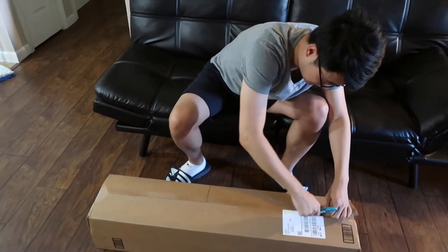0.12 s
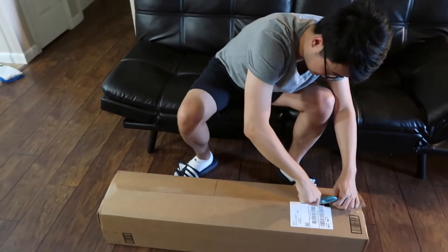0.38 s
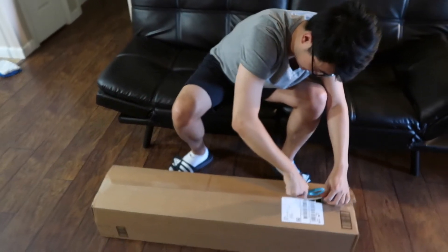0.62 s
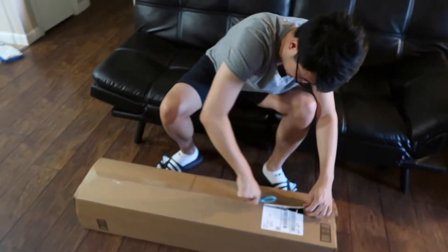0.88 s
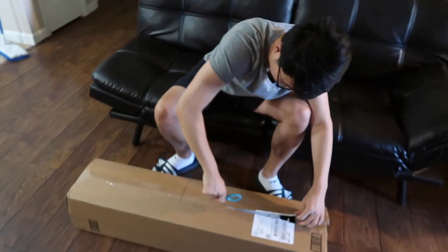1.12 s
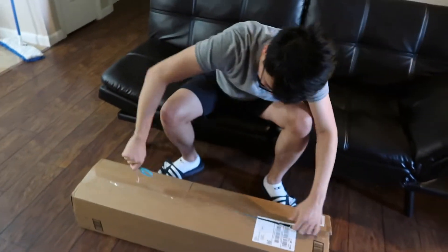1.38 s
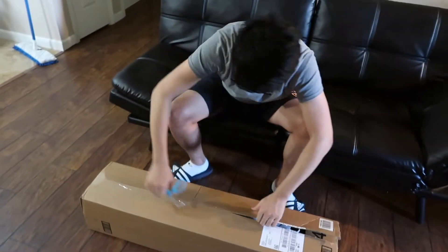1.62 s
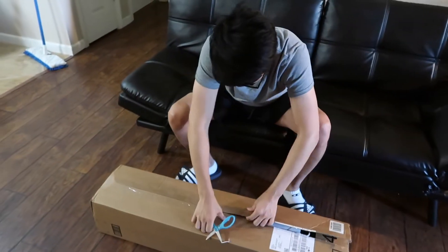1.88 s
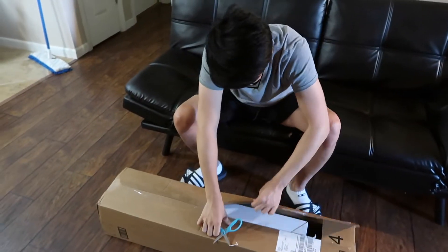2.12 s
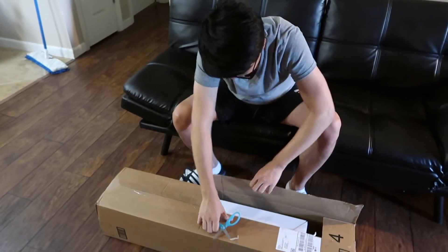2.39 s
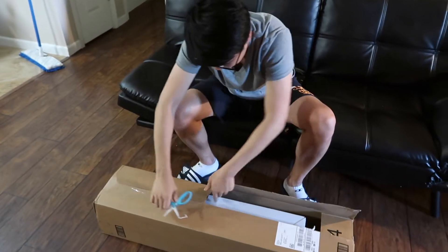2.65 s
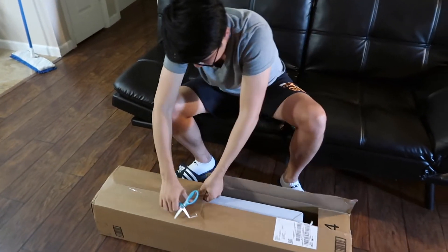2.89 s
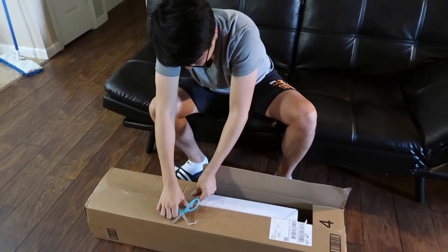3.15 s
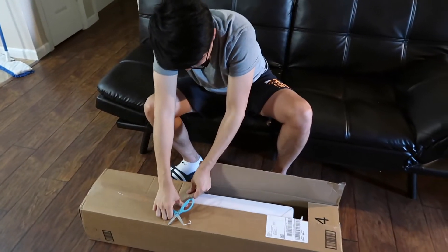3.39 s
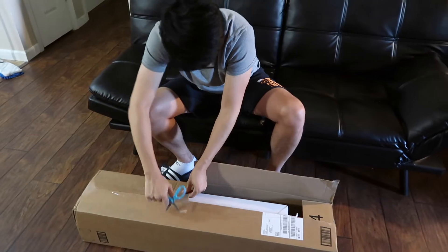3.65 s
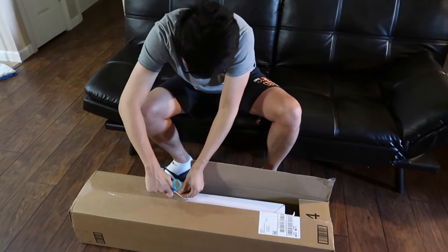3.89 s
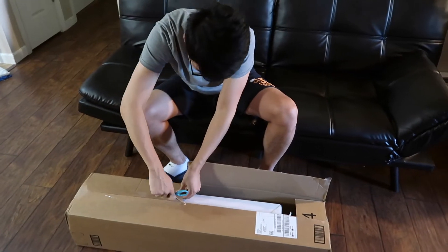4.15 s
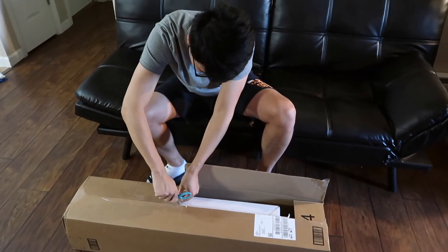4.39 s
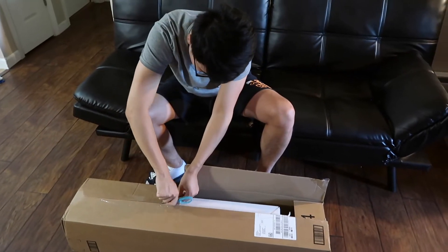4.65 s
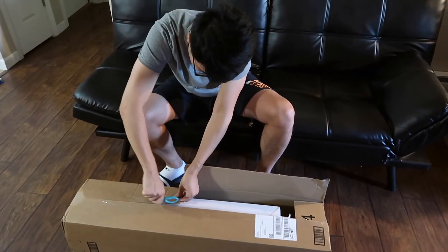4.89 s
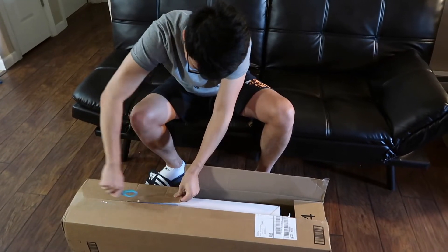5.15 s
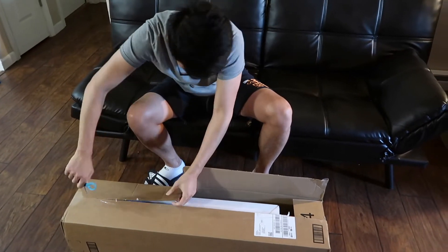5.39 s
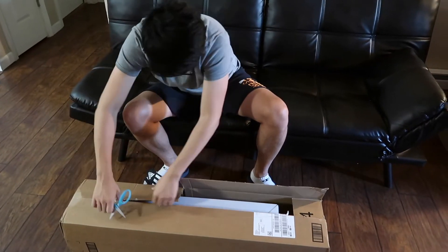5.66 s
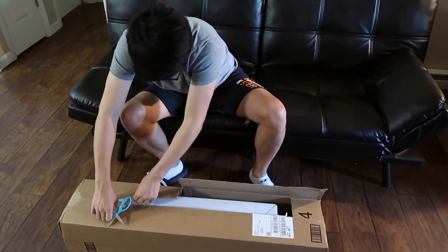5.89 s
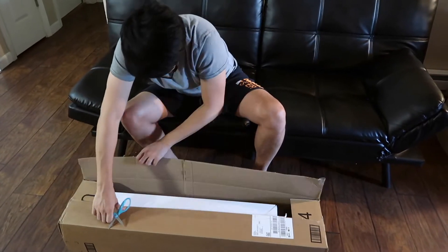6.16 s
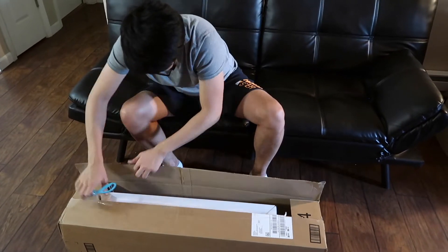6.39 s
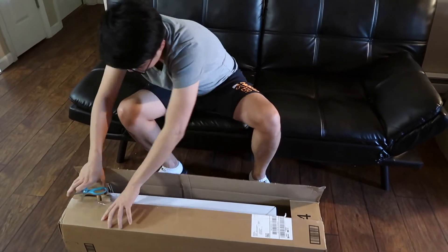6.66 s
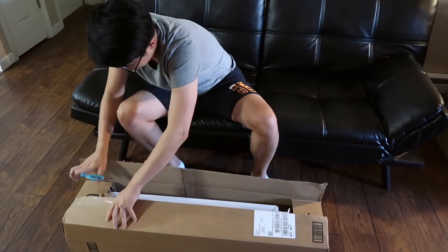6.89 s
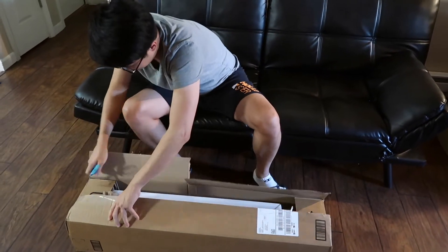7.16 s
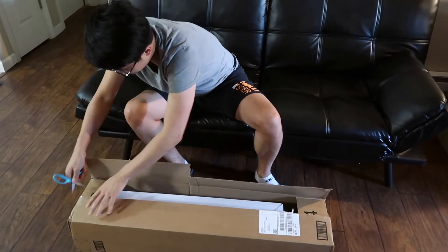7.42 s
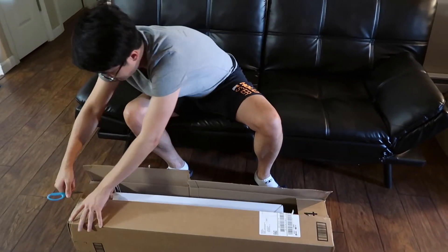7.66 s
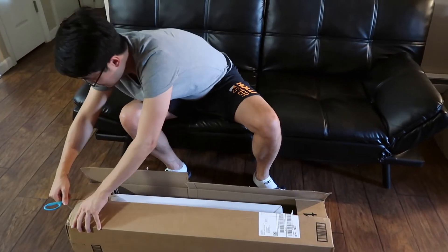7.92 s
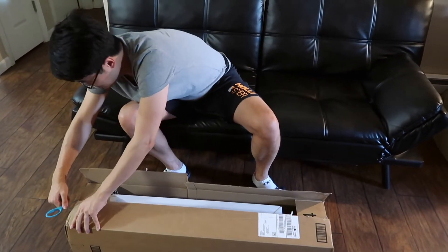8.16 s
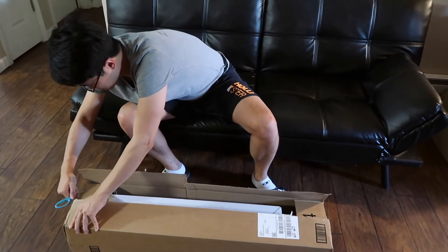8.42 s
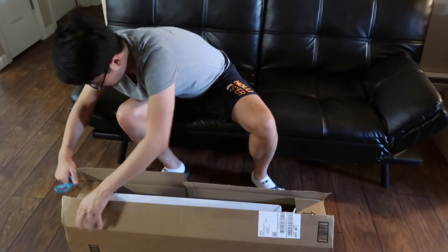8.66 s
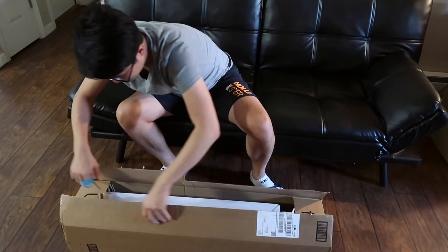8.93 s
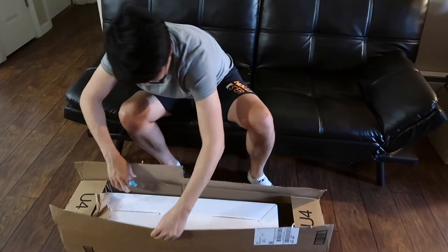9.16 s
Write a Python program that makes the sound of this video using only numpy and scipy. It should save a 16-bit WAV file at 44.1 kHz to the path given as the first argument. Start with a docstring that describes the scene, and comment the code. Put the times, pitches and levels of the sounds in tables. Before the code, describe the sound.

Jerky cardboard tearing and blade rasps drum a long empty-sounding carton indoors, broken by a hard loud snap and lighter handling rustle.

```python
"""Slitting a taped cardboard box

A scissor blade slits the tape of a long cardboard box on a wooden floor; tape snaps, flaps tear open and knock.
Fibres letting go in jerks drive the modes of the hollow box, rasp its top panel and fizz; each snap is a
short ring with a crack, a thump of the box and a thud of the floor. A hard-walled living room answers with
noise tails and filtered noise makes the ventilation hum behind. A two-port camera microphone listens
from above, its gain control ducking after the loudest snaps.
"""
import sys
import numpy as np
from scipy import signal
from scipy.fft import rfft, irfft, next_fast_len
from scipy.io import wavfile
from scipy.ndimage import uniform_filter1d, map_coordinates

SR = 44100
rng = np.random.default_rng(int(sys.argv[2]) if len(sys.argv) > 2 else 0)


def gain_from_db(level_db):
    """Convert decibel levels to linear amplitude factors (20 dB per decade)."""
    decades = np.asarray(level_db, float) / 20
    return 10 ** decades


def store_wav(level_fs):
    """Save 16-bit WAV to argv[1]."""
    pcm = np.round(np.clip(np.atleast_2d(level_fs), -1, 1) * 32767)
    wavfile.write(sys.argv[1], SR, pcm.T.astype(np.int16))


N = 409688


def unit(x):
    """Scaled to rms 1."""
    return x / np.sqrt(np.mean(x ** 2) + 1e-20)


def along(points, hz):
    """Values of (f/Hz, value) points, read off a logarithmic frequency axis."""
    f, v = np.transpose(points)
    return np.interp(np.log(hz + 1), np.log(f + 1), v)


def filtered(x, response):
    """x shaped by a complex response of frequency."""
    m = next_fast_len(x.shape[-1] + 8192)
    spectrum = rfft(x, m) * response(np.fft.rfftfreq(m, 1 / SR))
    return irfft(spectrum, m)[..., :x.shape[-1]]


def modes(table):
    """Causal response of a set of resonances, alternating in sign."""
    def response(f):
        total = 0
        for k, (centre, width, db) in enumerate(table):
            resonance = 1j * f * width / (centre * centre - f * f + 1j * f * width)
            total = total + (-1) ** k * gain_from_db(db) * resonance
        return total
    return response


def wobble(rate):
    """A smooth random curve, rate knots a second."""
    knots = rng.standard_normal(int(N * rate / SR) + 4)
    return map_coordinates(knots, [np.arange(N) * rate / SR])


def slips(rate, spread_db, clump_db):
    """Stick-slip: sparse impulses, rate a second, of uneven size that come in clumps."""
    size = np.minimum(rng.exponential(size=N), 5)  # no slip is without bound
    level = gain_from_db(spread_db * size + clump_db * wobble(45))
    return (rng.random(N) < rate / SR) * rng.standard_normal(N) * level


def played(force, table, spot_hz, focus_db):
    """Rms-1 sound of a set of modes; those near the pressed spot's favourite pitch stand out."""
    near = [gain_from_db(db - focus_db * np.log2(hz / spot_hz) ** 2) for hz, _, db in table]
    tones = [unit(filtered(force, lambda f: modes([(hz, width, 0)])(f) ** 2)) for hz, width, _ in table]
    return np.sum(np.multiply(near, tones), 0) / np.linalg.norm(near, axis=0)


def curves(rows):
    """One value per sample for each column after the time."""
    s, *columns = np.transpose(rows)
    return [np.interp(np.arange(N) / SR, s, c) for c in columns]


def swells(s, rise, hold, fall):
    """Power over time in ms steps, one row per event: climb, hold, fall (dB a second)."""
    t = np.arange(0, N / SR + .002, 1e-3) - np.asarray(s)[:, None]
    climb = 17.5 * t / np.clip(rise, 1e-3, None)[:, None]  # 17.5 dB in one rise time
    decay = -fall * (t - np.abs(hold)[:, None])
    return gain_from_db(np.minimum(np.minimum(climb, 0), decay)) ** 2


def per_sample(x):
    """Ms steps stretched to samples."""
    return np.interp(np.arange(N) / SR * 1000, np.arange(len(x)), x)


# rips start at once, hold and die:
# [t/s, hold/s, box drumming level/dB, its favourite f/Hz, surface rasp level/dB, tape fizz level/dB]
RIPS = [(0.178, 0.0064, -26, 239, -41.5, -51.5), (0.28, .12, -27, 260, -36.5, -44.5),
        (0.728, .1, -12.5, 289, -23, -34), (1.893, 0.024, -19.5, 370, -23, -28),
        (1.982, 0.042, -16.5, 340, -14.5, -21), (2.734, 0.045, -34, 292, -56, -61),
        (3.17, 0.079, -42, 320, -47, -67), (4.689, 0.082, -29.5, 373, -24, -29),
        (4.934, .06, -32, 269, -38, -54), (5.453, 0.013, -35, 358, -37.5, -40),
        (5.596, .02, -50, 330, -54, -50.5), (5.941, .015, -27.5, 220, -28.5, -40),
        (6.024, 0.013, -13, 337, -25, -28), (6.693, 0.005, -35, 288, -35, -71),
        (7.09, 0.019, -24.5, 363, -24.5, -31.5), (7.264, 0.022, -37, 352, -36, -42),
        (8.3, 0.055, -17.5, 343, -26, -34)]
# drags of blade or hand swell to a peak and die:
# [peak t/s, rise/s, box drumming level/dB, its favourite f/Hz, surface rasp level/dB, tape fizz level/dB]
DRAGS = [(0.464, .08, -31.5, 292, -32.5, -52), (0.57, 0.055, -30.5, 255, -39, -51),
         (0.68, 0.14, -33, 257, -35.5, -43.5), (0.91, 0.061, -18, 280, -39, -47),
         (1.084, 0.046, -13.5, 290, -28, -39.5), (1.138, 0.15, -15, 256, -24, -33.5),
         (1.21, 0.052, -14.5, 262, -20.5, -35.5), (1.255, 0.08, -10.5, 299, -20, -28),
         (1.294, 0.052, -14.5, 320, -20.5, -30), (1.328, 0.035, -29, 320, -42, -49),
         (1.85, .06, -32, 242, -47, -59), (2.232, 0.052, -14, 320, -15, -21.5),
         (2.902, 0.029, -32, 316, -41, -45), (3.021, 0.1, -34, 260, -39.5, -48),
         (3.33, .1, -45, 302, -42.5, -46.5), (3.44, 0.3, -36.5, 235, -42.5, -46),
         (3.57, 0.042, -37, 346, -38, -44), (4.23, .07, -54, 310, -46, -54.5),
         (4.47, .05, -37, 319, -50, -54.5), (5.0, 0.045, -28.5, 260, -42, -55),
         (5.07, 0.12, -17, 226, -37, -62), (5.132, 0.036, -16, 273, -25, -53),
         (5.199, .05, -10, 320, -24.5, -36.5), (5.26, 0.057, -16.5, 337, -21, -34.5),
         (5.85, 0.22, -34.5, 280, -41, -49), (5.989, 0.011, -25, 302, -19.5, -24.5),
         (6.3, 0.17, -80, 344, -45.5, -48), (6.98, 0.3, -44, 310, -46, -54),
         (7.062, .02, -34, 170, -44, -50.5), (7.8, 0.096, -34, 413, -39, -57),
         (7.868, 0.066, -38, 417, -38, -46.5), (8.17, .1, -36.5, 356, -55.5, -64),
         (8.44, .06, -29.5, 320, -33, -43), (8.54, 0.078, -38, 329, -38, -59),
         (8.65, .07, -44, 352, -42.5, -48), (9.0, 0.24, -46, 228, -49, -50),
         (9.07, 0.033, -40, 247, -38, -57), (9.16, .06, -45, 240, -45, -54),
         (9.24, .05, -38.5, 230, -40, -51)]
# light handling between the strokes: [t/s, drumming level/dB]
HANDS = [(0, -41), (.15, -60), (1.0, -41.5), (1.5, -32.5), (1.8, -37.5), (2.6, -43.5), (2.8, -43),
         (3.7, -46.5), (4.6, -49.5), (4.9, -51), (5.5, -47), (6.5, -91), (6.85, -47), (7.5, -51),
         (8.0, -46.5), (8.8, -45.5), (9.29, -50.5)]
# the whole box rocks and booms: [t/s, rise/s, hold/s, level/dB]
ROCKS = [(0.485, .1, 0.033, -43), (0.76, 0.058, 0.089, -44), (1.136, 0.052, 0.18, -29),
         (2.827, 0.12, .03, -38.5), (4.72, 0.044, .02, -46), (6.033, .08, 0.013, -26),
         (6.728, .1, 0.023, -40), (7.11, 0.13, 0.041, -35), (8.308, 0.013, 0.1, -25.5),
         (9.222, .1, .03, -43)]
RASP_FALL = 154  # dB a second after the hold, for rasp and scratch


def effort():
    """Gains of drumming, rasp, fizz and boom, and the two favourite pitches: powers of all strokes add."""
    rip_rise_s, drag_hold_s = 0.0051, 0.011
    drum_fall, fizz_fall, boom_fall = 144, 205, 155  # dB a second after the hold
    hands_hz, hands_rasp_db, hands_fizz_db = 292, -5, -12  # dB re the hands' drumming
    boom_re_drum_db, idle_boom_db = -33.5, -50.5  # every stroke shakes the box a little
    rips, drags = np.array(RIPS), np.array(DRAGS)
    s, _, drum_db, hz, rasp_db, fizz_db = np.vstack([rips, drags]).T
    rise = np.r_[np.full(len(rips), rip_rise_s), drags[:, 1]]
    hold = np.r_[rips[:, 1], np.full(len(drags), drag_hold_s)]
    hands = gain_from_db(curves(HANDS)[0] + 0.83 * wobble(8)) ** 2

    def layer(db, fall):
        return per_sample(gain_from_db(db) ** 2 @ swells(s, rise, hold, fall))

    strokes = layer(drum_db, drum_fall)
    # the favourite pitch is a power-weighted mean
    weighted_hz = layer(drum_db + 10 * np.log10(hz), drum_fall) + hands_hz * hands
    drum_hz = weighted_hz / (strokes + hands)
    rasp = np.sqrt(layer(rasp_db, RASP_FALL) + hands * gain_from_db(hands_rasp_db) ** 2)
    fizz = np.sqrt(layer(fizz_db, fizz_fall) + hands * gain_from_db(hands_fizz_db) ** 2)
    *rock, rock_db = np.transpose(ROCKS)
    rocking = per_sample(gain_from_db(rock_db) ** 2 @ swells(*rock, boom_fall))
    boom = np.sqrt(rocking + strokes * gain_from_db(boom_re_drum_db) ** 2 + gain_from_db(idle_boom_db) ** 2)
    # harder rasping sounds higher: 8 Hz per dB above -47.5 dB
    rasp_hz = 830 + 8 * np.clip(20 * np.log10(rasp) + 47.5, 0, None)
    return np.sqrt(strokes + hands), drum_hz, rasp, rasp_hz, fizz, boom


# wall and air modes of the box: [f/Hz, width/Hz, level/dB]
BOX_MODES = [(149, 77, -6), (185.3, 49.5, 0.5), (255.7, 67, -1.5), (320, 41, -1), (381.5, 62, 0.5),
             (447, 50.5, -2), (491, 66, -5.5)]
# air in the box and the floor under it: [f/Hz, width/Hz, level/dB]
BOOM_MODES = [(102.8, 38, -6), (54.4, 28, -34)]
# broad modes of the top panel: [f/Hz, width/Hz, level/dB]
PANEL_MODES = [(712, 350, 10), (849, 218, 7), (1230, 478, 12.5), (1553, 760, 4.5), (1906, 510, 1),
               (2565, 750, -1)]
# colour of the tape fizz: [f/Hz, relative level/dB]
FIZZ_COLOUR = [(1410, -20), (2400, 0), (2850, -2), (3550, -6), (4190, -6.5), (4580, -9.5), (8560, -19),
               (12300, -32), (14500, -70)]


def work():
    """Fibres let go in jerks: they drum the box, make its air boom, rasp the panel and fizz."""
    drum_gain, drum_hz, rasp_gain, rasp_hz, fizz_gain, boom_gain = effort()
    jerk = gain_from_db(1.04 * wobble(25))  # the hand's pressure, shared by all layers
    shoves = slips(650, spread_db=1.3, clump_db=2.2)
    fibres = slips(6000, spread_db=1.9, clump_db=2.6)
    drum = drum_gain * played(shoves, BOX_MODES, drum_hz, focus_db=16)
    boom = boom_gain * unit(filtered(fibres, lambda f: modes(BOOM_MODES[:1])(f) ** 2))  # air mode only
    rasp = rasp_gain * played(fibres, PANEL_MODES, rasp_hz, focus_db=5.5)
    fizz = fizz_gain * unit(filtered(fibres, lambda f: gain_from_db(along(FIZZ_COLOUR, f))))
    return jerk * (drum + boom + rasp + fizz)


# the blade's tip scratches the panel: [t/s, rise/s, hold/s, level/dB, favourite f/Hz]
SCRATCHES = [(0.448, 0.042, 0.041, -34, 2130), (1.998, .03, 0.017, -27, 4070),
             (3.162, .004, 0.039, -40.5, 1890), (4.68, .004, 0.068, -31, 2340),
             (5.148, 0.012, 0.12, -32, 1360), (5.937, .004, .015, -33, 1480),
             (6.005, .01, 0.017, -31.5, 3550), (8.301, .004, 0.053, -33.5, 2150),
             (8.528, .02, 0.013, -38.5, 1050), (8.622, 0.025, 0.029, -42.5, 1170),
             (9.046, 0.0053, 0.055, -46, 2080)]
# small modes of the panel under the tip: [f/Hz, width/Hz, level/dB]
TIP_MODES = [(1100, 550, 0), (1500, 750, 0), (2000, 1000, 0), (2700, 1300, 0), (4200, 1000, -2)]


def scratch():
    """Coarse, sparse slips of the blade's tip in the upper modes of the panel."""
    *when, db, hz = np.transpose(SCRATCHES)
    shape = swells(*when, RASP_FALL) + 1e-12
    power = per_sample(gain_from_db(db) ** 2 @ shape)
    spot_hz = per_sample(hz @ shape / shape.sum(0))
    coarse = slips(2500, spread_db=1, clump_db=2.5)
    return np.sqrt(power) * played(coarse, TIP_MODES, spot_hz, focus_db=23.5)


# snaps and knocks, levels ahead of each layer's filter and trim; thump, thud and crack are re the ring:
# [t/s, ring level/dB, box thump level/dB, floor thud level/dB, crack level/dB, nominal ring f/Hz]
SNAPS = [(0.18, -33, -2, -15, -39, 850), (0.21, -28.5, 2, -17, -16, 800),
         (0.297, -19.5, 2.5, -21, -39, 980), (0.731, -6.5, -20, -28, -17, 1030),
         (0.908, -12.5, 4.5, -21, -42, 850), (1.836, -29.5, 11.5, -7, -33, 802),
         (1.898, -2, -7, -32, -25, 1330), (1.933, -5, -23, -38, -18, 1410), (1.976, -2, -8, -49, -15, 1340),
         (2.025, -3.5, 2, -46, -25, 1970), (2.225, -4, 7, -44, -11.5, 830),
         (2.738, -21, 8.5, -12, -23, 805), (2.788, -29.5, 18, 2, -26, 1160),
         (3.003, -14.5, -5, -17, -31, 902), (3.161, -16, -15, -22, -4, 1830),
         (3.547, -22.5, 6.5, -13, -32, 1000), (4.687, 16, -2.5, -19, -27, 1530),
         (4.693, 11.5, -44, -77, -39, 1230), (4.95, -14.5, 6.5, -38, -25, 1280),
         (5.597, -23, -6, -15, -9.5, 1390), (5.941, -11.5, -13, -13, -13, 1380),
         (6.028, 4.5, 2, -25, -26, 1290), (6.693, -10.5, -3, -15, -27, 780),
         (6.948, -23.5, -9, -19, -6, 1030), (7.092, -2, -15, -13, -30.5, 825),
         (7.286, -16, -7, -31, -11, 1270), (7.857, -30.5, -12, -25, -6.5, 1300),
         (8.301, -5.5, 3, -18, -15.5, 1030)]


def snaps():
    """Each release flicks the panel for a few cycles, cracks, and pushes the box and the floor."""
    t = np.arange(SR // 10) / SR
    ring, crack, push, thud = np.zeros((4, N + SR))
    draws = rng.standard_normal((len(SNAPS), 2, len(t)))

    def decay(t60):
        return gain_from_db(-60 * t / t60)

    for (s, db, thump_db, thud_db, crack_db, hz), (tearing, crumpling) in zip(SNAPS, draws):
        start = round(s * SR) + 40
        at = slice(start, start + len(t))
        # pitch sags from 1.33 to 0.75 of nominal as tension goes
        cycles = hz * (0.75 * t + 0.00056 * (1 - np.exp(-t / 0.00096)))
        flick = np.sin(2 * np.pi * cycles) * (1 - np.exp(-t / .0003))
        ring[at] += gain_from_db(db + 1.5) * decay(.006) * flick
        # a tick, then fibres tearing
        crack[at] += gain_from_db(db + crack_db) * (4 * (t == 0) + .6 * decay(.025) * tearing)
        # a shove, then crumpling
        push[at] += gain_from_db(db + thump_db) * (decay(0.0014) + 0.27 * decay(0.014) * crumpling)
        thud[at] += gain_from_db(db + thud_db) * decay(0.0098)

    def crack_colour(f):
        band = 1j * f / (1500 + 1j * f) / (1 + 1j * f / 5000) ** 2
        return band / (1 + (f / 10000) ** 8)

    thump = gain_from_db(13.5) * filtered(push, lambda f: modes(BOX_MODES)(f) / (1 + 1j * f / 900))
    thud = gain_from_db(13) * filtered(thud, modes(BOOM_MODES))
    crack = gain_from_db(8.5) * filtered(crack, crack_colour)
    return (ring + thump + thud + crack)[:N]


# tape chirps as it lets go: [t/s, nominal f/Hz, t60/s]
SQUEAK = (5.458, 1390, .014)


def squeak():
    """A short rough buzz of quick slips: a tone and a second one nearly an octave up, phases jittered."""
    s, hz, t60 = SQUEAK
    t = np.clip(np.arange(N) / SR - s, 0, None)
    swell = np.minimum(t / .004, 1) * gain_from_db(-60 * t / t60)
    turn = 2 * np.pi * hz * t + .7 * wobble(300)
    lower, upper = np.sin(1.05 * turn), np.sin(1.95 * turn)
    return swell * (gain_from_db(-11) * lower + gain_from_db(-15) * upper)


# left-right likeness of diffuse sound: [f/Hz, correlation]
LIKENESS = [(60, 1.0), (180, 1), (540, 1), (1600, 0.58), (4780, -0.19), (14300, 0.21)]


def diffuse(pair):
    """Two unrelated signals mixed to the likeness of a diffuse field at close ports."""
    def weights(hz):
        angle = np.arccos(np.clip(along(LIKENESS, hz), -1, 1)) / 2
        return np.array([np.cos(angle), np.sin(angle)])
    mid, side = filtered(pair, weights)
    return np.array([mid + side, mid - side])


# decay of the living room: [f/Hz, t60/s]
ROOM_DECAY = [(100, 0.26), (400, 0.48), (1500, 0.47), (4000, 0.78), (10000, 0.36)]


def room(x, count=31):
    """Reverberation by noise tails; the source moves, so each stretch of time gets its own tail."""
    out, step = np.zeros((2, N + 2 * SR)), N // count + 1
    for k in range(count):
        noise = rng.standard_normal((2, SR * 3 // 4))
        hz, t, z = signal.stft(noise, SR, nperseg=256)
        decay = gain_from_db(-60 * t / along(ROOM_DECAY, hz)[:, None])
        tail = signal.istft(z * decay, SR, nperseg=256)[1]
        part = np.pad(x[k * step:(k + 1) * step], (180, 0))  # first wall after 4 ms
        wet = signal.fftconvolve(part[None], tail / np.linalg.norm(tail[0]), axes=1)
        out[:, k * step:k * step + wet.shape[1]] += wet
    return diffuse(out[:, :N])


# colour of the ventilation's air noise: [f/Hz, relative level/dB]
AIR_COLOUR = [(13, -37.5), (22, -3.5), (90, -8.5), (122, -7), (155, -1.5), (240, -6), (361, -8),
              (391, -19.5), (425, -4.5), (573, -13), (908, -9), (1260, -18.5), (1740, -23), (11400, -46.5),
              (14500, -87)]
# fan tones: [f/Hz, width/Hz, level/dB]
FAN_TONES = [(43.6, 3, -51.5), (362, 7.6, -47)]


def ventilation():
    """Nearly steady air noise with fan tones made fuzzy by narrow bands of noise."""
    def coloured(response):
        return unit(filtered(rng.standard_normal((2, N)), response))
    air = gain_from_db(-40.5 + 0.22 * wobble(4.3)) * coloured(lambda f: gain_from_db(along(AIR_COLOUR, f)))
    for hz, width, db in FAN_TONES:
        air = air + gain_from_db(db) * coloured(lambda f: np.exp(-((f - hz) / width) ** 2))
    return diffuse(air)


def scene():
    """Direct sound, which reaches the left port late, with room and background."""
    lag_s = .00005
    hits, rub = snaps() + squeak(), work() + scratch()
    ports = np.array([[-1], [1]])
    direct = filtered(hits + rub, lambda f: np.exp(1j * np.pi * f * lag_s * ports))
    return direct + room(gain_from_db(1.5) * hits + gain_from_db(-5.0) * rub) + ventilation()


def band_limit(x):
    """A steep low-pass at the top of the band."""
    return signal.sosfilt(signal.butter(12, 14890, fs=SR, output="sos"), x)


# balance of the microphone ports: [f/Hz, left minus right level/dB]
PORT_BALANCE = [(60, -.3), (250, -1), (600, -3.8), (1500, -4), (4000, -2.5), (8000, -1.7), (13000, -3.8)]


def record(dry):
    """Port balance, gain control with fast attack and slow release, soft clipping, treble limit."""
    x = filtered(dry, lambda f: gain_from_db(along(PORT_BALANCE, f) * np.array([[.5], [-.5]])))
    power = np.abs(uniform_filter1d(np.mean(x ** 2, 0), 60))
    level_db = 10 * np.log10(power + 1e-12)
    over_db = np.clip(0.68 * (level_db + 11.0), 0, 11)  # acts above -11 dB, by 11 dB at most
    ramp_db = 7.8 * np.arange(N) / SR  # release speed, dB a second
    duck_db = np.maximum.accumulate(over_db + ramp_db) - ramp_db
    gain = np.roll(gain_from_db(-uniform_filter1d(duck_db, 260)), 300)  # reacts some ms late
    x = x * gain
    rounded = x / (1 + np.abs(x) ** 8) ** (1 / 8)
    mix = filtered(rounded, lambda f: 1 / (1 + (f / 13900) ** 16))  # steep low-pass at 13.9 kHz
    return band_limit(np.clip(mix, -1, 1))


dry = scene()
out = record(dry)
store_wav(out)
```